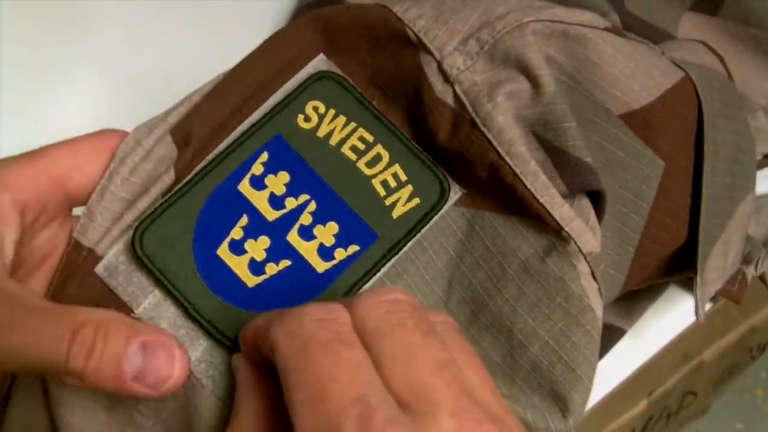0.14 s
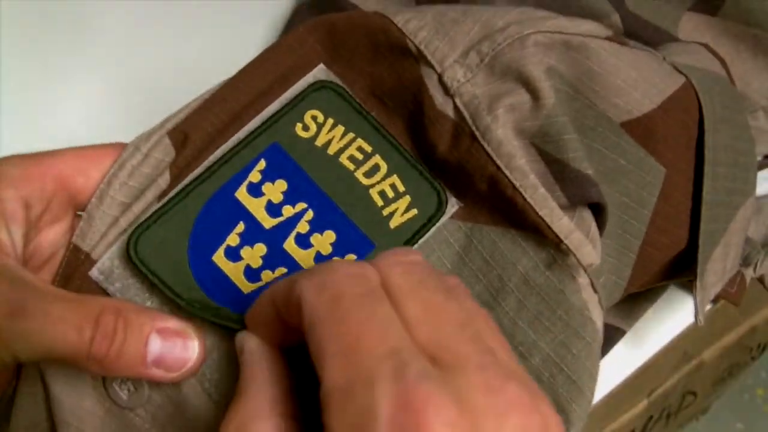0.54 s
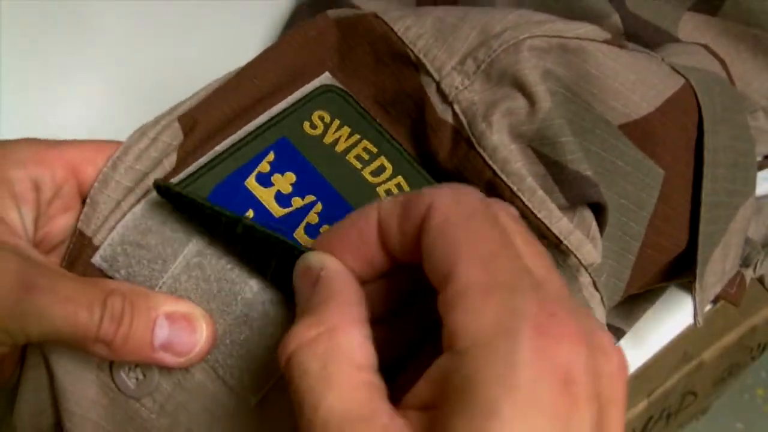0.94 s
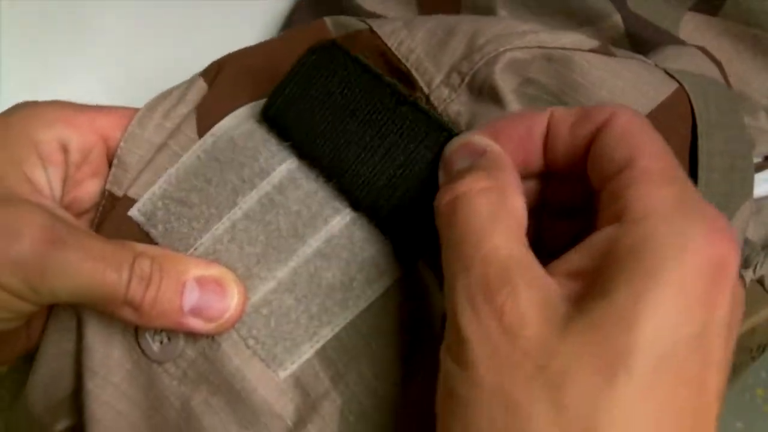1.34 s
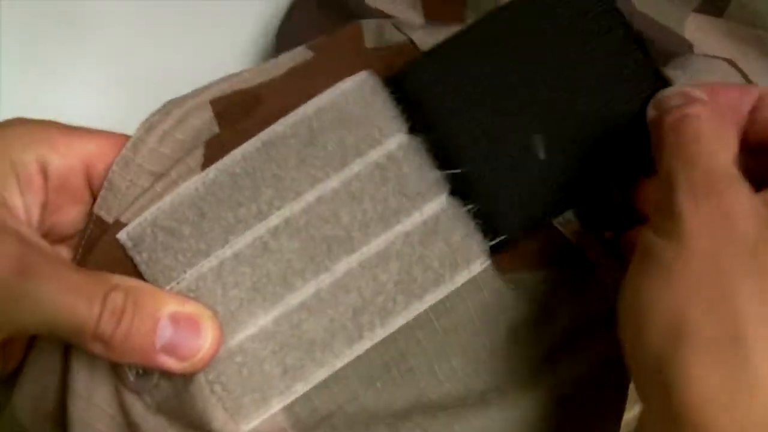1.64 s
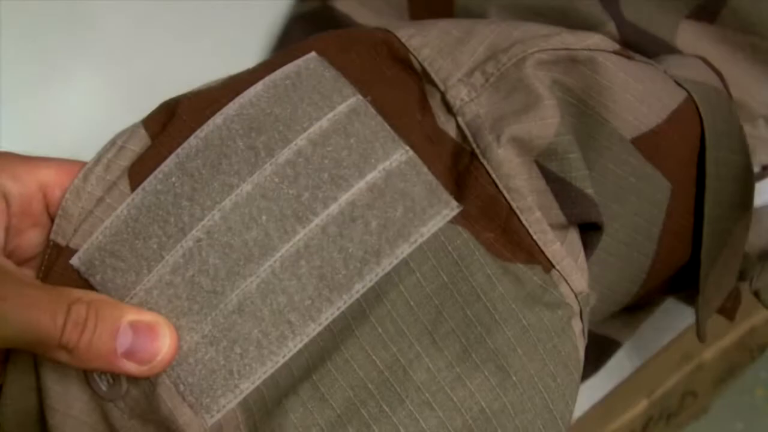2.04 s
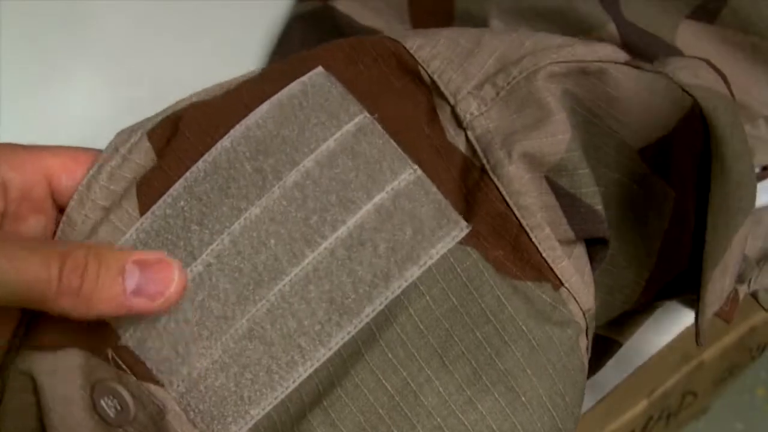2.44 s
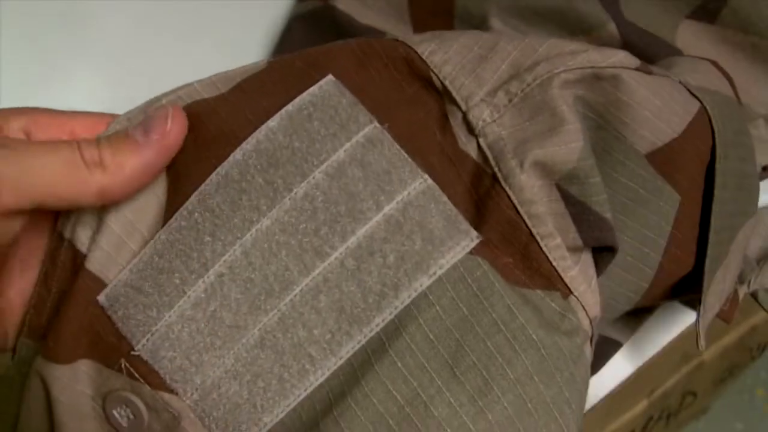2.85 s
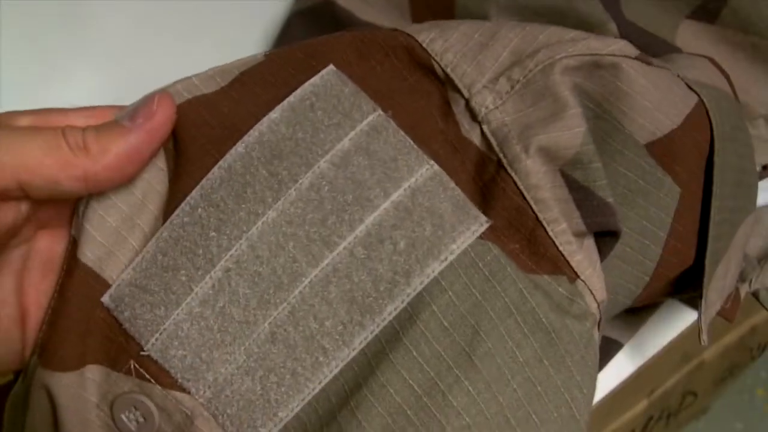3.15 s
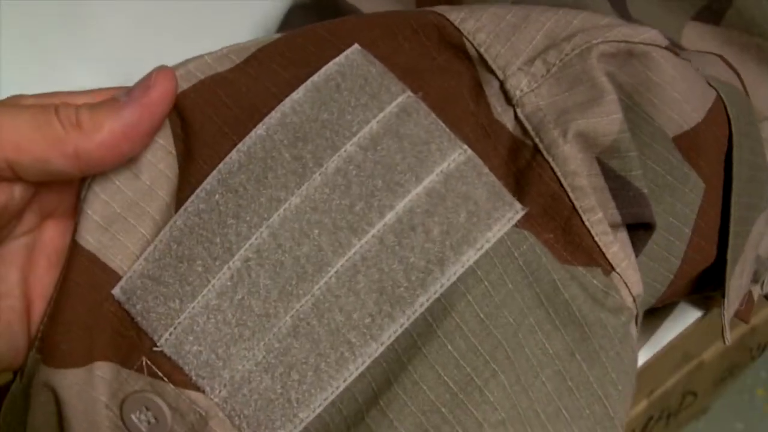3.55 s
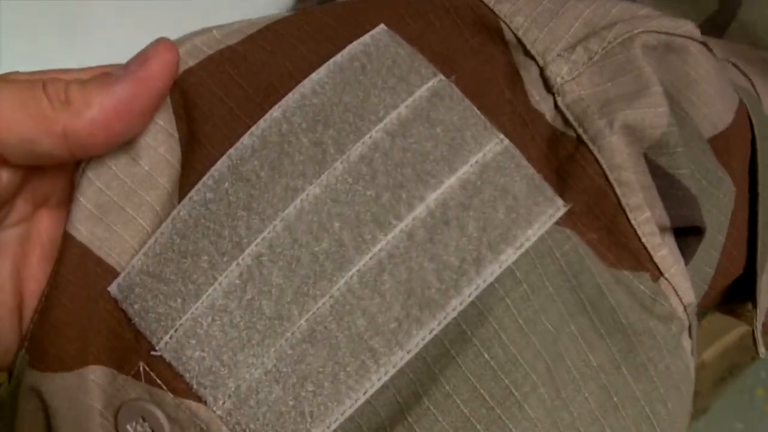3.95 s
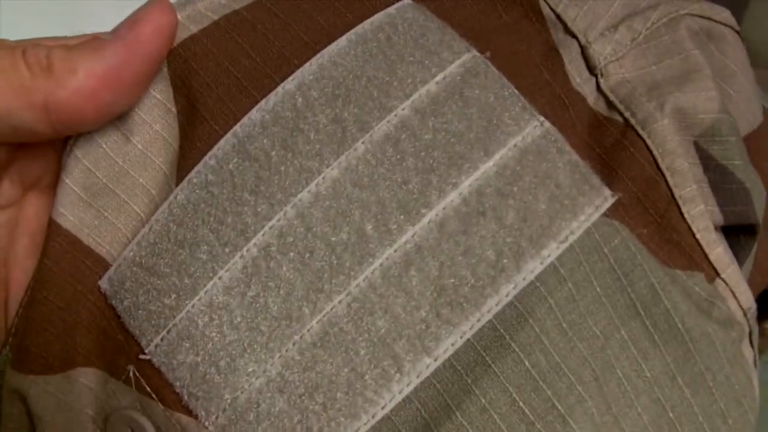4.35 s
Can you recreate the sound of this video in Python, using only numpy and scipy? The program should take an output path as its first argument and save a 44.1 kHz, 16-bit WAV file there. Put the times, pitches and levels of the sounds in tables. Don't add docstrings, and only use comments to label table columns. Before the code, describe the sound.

Separate bright crackles speed up into dense hook-and-loop tearing, loudest just past a second and a half, with a dull thump of backing cloth beneath. The tearing ends suddenly. Hands then brush the fabric softly, with small hollow clicks of a plastic housing, close and dry indoors over faint steady hiss.

```python
import sys
import numpy as np
from scipy import signal
from scipy.fft import rfft, irfft
from scipy.io import wavfile
from scipy.ndimage import uniform_filter1d

SR = 44100
rng = np.random.default_rng(int(sys.argv[2]) if len(sys.argv) > 2 else 0)


def materialize(psi):
    bounded = np.clip(np.atleast_2d(psi).T, -1, 1)
    quanta = np.round(bounded * 32767).astype(np.int16)
    wavfile.write(sys.argv[1], SR, quanta)


def boost(x):
    u = np.asarray(x, float) / 20
    return 10 ** u


N = 198625


def rms_one(x):
    return x / np.sqrt(np.mean(x ** 2, axis=-1, keepdims=True) + 1e-20)


def band(x, low_hz, high_hz):
    return signal.sosfilt(signal.butter(2, [low_hz, min(high_hz, 0.45 * SR)], "band", fs=SR, output="sos"), x)


def highpass(x, order, hz):
    return signal.sosfilt(signal.butter(order, hz, "high", fs=SR, output="sos"), x)


def coloured(spectrum):
    hz, db = np.transpose(spectrum)
    bins = np.arange(N // 2 + 1) * SR / N + 1
    gain = boost(np.interp(np.log(bins), np.log(hz), db))
    return rms_one(irfft(rfft(rng.standard_normal(N)) * gain, N))


def ring(clicks, hz, t60_s):
    decay, turn = boost(-60 / (t60_s * SR)), 2 * np.pi * hz / SR
    return signal.lfilter([0, np.sin(turn)], [1, -2 * decay * np.cos(turn), decay * decay], clicks + 1e-18)


def place(times_s, shapes):
    length = shapes.shape[1]
    out = np.zeros(N + length)
    first = np.round(np.asarray(times_s) * SR).astype(int)
    np.add.at(out, first[:, None] + np.arange(length), shapes)
    return out[:N]


# hz, level_db (per Hz)
HISS_COLOUR = [(25, -20), (60, -16), (150, -11), (280, -9.5), (450, -3.5), (800, -6.5), (1250, -2),
               (1700, -8), (4000, -7), (8000, -8), (12000, -5.5), (15000, -7)]


def hiss(level_db=-67):
    return boost(level_db) * coloured(HISS_COLOUR)


# hz, level_db (per Hz)
SLIDE_COLOUR = [(300, -25), (1200, -11), (3000, -7), (6000, -3.5), (10500, -1), (15000, -5)]
# hz, level_db (per Hz)
RUB_COLOUR = [(150, -27.5), (400, -2.5), (1200, 0.5), (2500, -8), (6000, -21.5)]
# start_s, length_s, slide_db, rub_db
CLOTH_SLIDES = [
    (0, 0.16, -68, -67.5),
    (0.325, 0.1, -74, -74.5),
    (1.809, 0.09, -61.5, -69.5),
    (2.018, 0.021, -70.5, -76),
    (2.31, 0.011, -64, -76.5),
    (2.376, 0.14, -62.5, -72.5),
    (2.607, 0.1294, -71.5, -71.5),
    (2.798, .14, -66.5, -73),
    (3.042, .16, -68.5, -72),
    (3.753, 0.39, -69.5, -73.5),
]
SLIDE_RISE_DB_PER_S, SLIDE_FALL_DB_PER_S, RUB_FADE_DB_PER_S = 399.5, 150, 51
STILL_SLIDE_DB, STILL_RUB_DB = -80.5, -75.5


def rustle():
    start, length, slide_db, rub_db = np.transpose(CLOTH_SLIDES)[:, :, None]
    t = np.arange(0, N, 64) / SR
    before = np.maximum(start - t, 0)
    after = np.maximum(t - start - length, 0)
    slide_db = np.max(slide_db - SLIDE_RISE_DB_PER_S * before - SLIDE_FALL_DB_PER_S * after, axis=0)
    rub_db = np.max(rub_db - RUB_FADE_DB_PER_S * (before + after), axis=0)
    grain = rms_one(uniform_filter1d(rng.standard_normal((2, N)), size=400))
    every_s = np.arange(N) / SR
    slide_db = np.interp(every_s, t, np.maximum(slide_db, STILL_SLIDE_DB))
    rub_db = np.interp(every_s, t, np.maximum(rub_db, STILL_RUB_DB))
    slide = boost(slide_db + 1.5 * grain[0]) * coloured(SLIDE_COLOUR)
    rub = boost(rub_db + 0.94 * grain[1]) * coloured(RUB_COLOUR)
    return slide + rub


# start_s, peak_db, hollow_db, ring_db
HOUSING_KNOCKS = [(0.0186, -40.5, -12.5, -20), (0.252, -34.5, -51, -16.5), (0.387, -39.5, -18.5, -22),
                  (0.705, -38, -19.5, -21), (0.803, -36.5, -27, -17), (1.0231, -37.5, -24, -16),
                  (1.1046, -35.5, -39, -15), (1.3553, -36.5, -20.5, -19), (1.487, -37, -35, -15.5),
                  (2.052, -46, -7, -16), (2.215, -57, -30, -37), (2.457, -58, -25, -30),
                  (2.3029, -34.5, -29, -19), (2.4231, -40, -15.5, -19), (2.5028, -50, -24, -26),
                  (2.6233, -40.5, -15, -18.5), (2.7409, -32.5, -30, -18), (2.8392, -38, -29, -24.5),
                  (3.857, -32.5, -55, -24.5), (4.0243, -42, -13, -14.5), (4.124, -35.5, -23, -16.5)]
# pitch_hz, level_db, t60_s
BODY_MODES = [(1012, -10.5, 0.0365), (1187, -8.5, 0.036), (1360, -5, 0.044), (1534, -8, 0.084),
              (1820, -13, 0.011), (568, -28, 0.12)]
# pitch_hz, level_db, t60_s
HOLLOW_MODES = [(388, 5, .095)]
# pitch_hz, level_db, t60_s
RING_MODES = [(1088, 0, .17), (1264, -8, .13)]
# pitch_hz, level_db, t60_s
EDGE_MODES = [(2150, 5.7, 0.025), (2510, 1.8, 0.014), (3126, 8.7, 0.019), (3780, 6.3, 0.011),
              (4870, 4.6, 0.0074)]
EDGE_DB, REBOUND = -19, 0.42


def knocks(rebound_s=0.00485, touch_s=0.00083, touch=0.11):
    s, peak_db, hollow_db, ring_db = np.transpose(HOUSING_KNOCKS)
    t = np.arange(160) / SR
    lead_s = 0.001
    out = 0
    groups = [(BODY_MODES, 0), (HOLLOW_MODES, hollow_db), (RING_MODES, ring_db), (EDGE_MODES, EDGE_DB)]
    for modes, group_db in groups:
        for hz, level_db, t60_s in modes:
            late, louder = rng.standard_normal((len(s), 2)).T
            contact = np.exp(-((t - 0.002 + 0.0004 * late[:, None]) / 0.00007) ** 2) / 6.3
            contact = contact * boost(peak_db + group_db + level_db + 1.4 * louder)[:, None]
            first_touch = place(s - touch_s - lead_s, touch * contact)
            blow = place(s - lead_s, contact)
            rebound = place(s + rebound_s - lead_s, REBOUND * contact)
            out = out + ring(first_touch + blow + rebound, hz, t60_s)
    return out


NEAR_DB, NEAR_T60_S = -9.5, 0.063
FAR_DB, FAR_T60_S = -17.5, 0.16


def surroundings(x):
    t = np.arange(int(0.4 * SR)) / SR
    near = boost(NEAR_DB - 60 * t / NEAR_T60_S) / np.sqrt(NEAR_T60_S * SR / 14)
    far = boost(FAR_DB - 60 * t / FAR_T60_S) / np.sqrt(FAR_T60_S * SR / 14)
    tail = rng.standard_normal(len(t)) * np.hypot(near, far) * np.clip(t / 0.0002, 0, 1)
    return signal.oaconvolve(x, band(tail, 250, 19000))[:N]


# pitch_hz, width_hz, level_db
BACKING_MODES = [(480, 140, -3.5), (746, 450, 2.5), (1330, 170, 2.5)]


def backing(jerk):
    modes = 0
    for k, (hz, width_hz, db) in enumerate(BACKING_MODES):
        modes = modes + (-1) ** k * boost(db) * width_hz * ring(jerk, hz, 2.5 / width_hz)
    return rms_one(rms_one(modes) + 1.3 * rms_one(band(jerk, 440, 2300)))


def hooks(times_s, peak_db, thump_db, loop_db, bright_db, jerk_s=0.0002):
    jerk = rng.standard_normal((len(times_s), 4, 256)) * np.exp(-np.arange(256) / SR / jerk_s)
    thump = boost(thump_db + 0.5)[:, None] * backing(jerk[:, 0])
    loop = boost(loop_db)[:, None] * rms_one(band(jerk[:, 1], 2200, 4600))
    stem = rms_one(band(jerk[:, 2], 4400, 8000))
    tip = boost(bright_db)[:, None] * rms_one(band(jerk[:, 3], 8000, 13000))
    release = (rms_one(loop + stem + tip) + thump) * np.hanning(512)[256:]
    return place(times_s, release * boost(peak_db - 15.5)[:, None])


def random_hooks(times_s, peak_db, thump_db, loop_db, bright_db, tint_db=3.0):
    tint = tint_db * rng.standard_normal((len(times_s), 3))
    return hooks(times_s, peak_db, thump_db + tint[:, 0], loop_db + tint[:, 1], bright_db + tint[:, 2])


# start_s, peak_db, thump_db, bright_db
STRONG_HOOKS = [(0.4362, -10.5, -9, -1), (0.4712, -26, -4, -6), (0.4935, -31.5, -16, -1),
                (0.524, -29, -12, 5), (0.5264, -31.5, -3, -18), (0.5293, -12, -14, 2.5),
                (0.581, -14.5, -11.5, 9), (0.582, -10, -9.5, 2), (0.6533, -16, -15.5, 5.5),
                (0.6538, -14, -16, 24), (0.744, -8, -15.5, 8), (0.7459, -17, -13, 15),
                (0.7944, -31, -17, 16), (0.8472, -17.5, -12.5, 6.5), (0.8782, -2.5, -15, 3),
                (0.987, -11.5, -10.5, 5.5), (1.0939, -17, -16.5, 6), (1.1199, -31, -24, 3),
                (1.1598, -18, -18, 6), (1.1648, -12.5, -17.5, 1.5), (1.1764, -5.5, -17.5, 3.5),
                (1.185, -21, -13.5, -0.5), (1.189, -14.5, -14.5, 0.5), (1.282, -12.5, -28, 20),
                (1.2929, -12.5, -18, 12), (1.421, -11.5, -19, 27.5), (1.423, -24, -10.5, 10),
                (1.4314, -17, -18, 5), (1.436, -29, -20.5, 9.5), (1.4537, -15, -18, 3)]
# start_s, peak_db
FIRST_PULL = [(0.8626, -13), (0.866, -13), (0.8696, -16.5), (0.8836, -18), (0.891, -24), (0.9027, -14.5),
              (0.9094, -11.5), (0.9197, -5.5), (0.9236, -8.5), (0.9253, -20.5), (0.9316, -12),
              (0.9343, -27.5), (0.937, -17), (0.9389, -8), (0.9405, -10), (0.9497, -18), (0.9531, -13.5),
              (0.9698, -13), (0.9746, -29.5), (0.9778, -20)]
# start_s, peak_db, thump_db
STRAY_TICKS = [(0.3292, -50, -21), (0.5041, -44, -5), (0.507, -44, 6), (0.5542, -36.5, -10),
               (0.572, -41, -17), (0.6397, -41, -21), (0.7, -41, -19), (0.709, -37, -15), (0.729, -35, -9),
               (0.7713, -35.5, -19), (0.805, -35, -11), (0.8114, -36, -19), (1.1424, -43.5, -2),
               (1.148, -32, -6), (1.4186, -32.5, -13), (1.506, -41, -24), (1.8376, -40, -1),
               (1.8701, -52.5, -6), (1.889, -49.5, -21.5), (1.9028, -48.5, -9)]
# start_s, peak_db, thump_db, loop_db, bright_db
CLOTH_CREASES = [
    (2.2662, -56, -25, -15, 15),
    (2.3114, -45, -18, -5, 2),
    (2.5262, -39, -22, -5, 8),
    (2.6085, -44, -20, -9, 12),
    (2.9173, -42, -19, -6, 0),
    (3.0659, -47, -17, -2, 1),
    (3.0949, -44, -20, -5, 7),
    (3.1602, -45, -20, -8, 5),
]
CRACKLE_THUMP_DB, CRACKLE_BRIGHT_DB, TICK_BRIGHT_DB = -13, 5.5, 5.5
LOOP_DB, FIRST_LOOP_DB, LOOPS_TAUT_S = -5.5, -28, 0.58


def lone_hooks():
    s, peak_db, thump_db, bright_db = np.transpose(STRONG_HOOKS)
    loop_db = np.where(s < LOOPS_TAUT_S, FIRST_LOOP_DB, LOOP_DB)
    snaps = hooks(s, peak_db, thump_db, loop_db, bright_db)
    crackle = random_hooks(*np.transpose(FIRST_PULL), CRACKLE_THUMP_DB, LOOP_DB, CRACKLE_BRIGHT_DB)
    ticks = random_hooks(*np.transpose(STRAY_TICKS), LOOP_DB, TICK_BRIGHT_DB)
    return snaps + crackle + ticks + hooks(*np.transpose(CLOTH_CREASES))


# start_s, level_db
PULL_FORCE = [
    [(.86, -30), (.93, -27.5), (.99, -24)],
    [(1.194, -25), (1.222, -20), (1.25, -26), (1.264, -20), (1.28, -30)],
    [(1.54, -31), (1.555, -29), (1.559, -20), (1.611, -13.5), (1.638, -18), (1.648, -27.5)],
    [(1.65, -20.5), (1.675, -19.5), (1.69, -27.5), (1.718, -26.5), (1.723, -42), (1.758, -41), (1.773, -22),
     (1.8, -25.5), (1.809, -27.5)],
]
# start_s, peak_db
ROW_SURGES = [(1.196, -11.5), (1.2023, -13.5), (1.2145, -11), (1.2221, -9), (1.238, -9), (1.2558, -12.5),
              (1.2668, -9.5), (1.5414, -9), (1.5441, -16.5), (1.5507, -16.5), (1.5582, -9), (1.5716, -10),
              (1.5907, -9), (1.6143, -7), (1.6353, -11.5), (1.6519, -5), (1.6553, -7), (1.661, -12.5),
              (1.6857, -14), (1.704, -12.5), (1.7189, -8), (1.7307, -19), (1.735, -17), (1.741, -13),
              (1.7531, -19.5), (1.7551, -17), (1.7617, -15), (1.774, -10), (1.7783, -12.5), (1.7941, -13)]
SWARM_LEVELS = [-35, -15, -16.5, -14]
BUNCH_GAP_S, BUNCH_DB, BUNCH_SPREAD_DB = 0.003, 6, 3.0
RIP_COLOUR = -15.5, -3, 6


def rips(bunch_s=0.0008, per_s=4000, spread_db=4.0):
    bunches = [np.transpose(ROW_SURGES)]
    for t, pull_db in map(np.transpose, PULL_FORCE[1:]):
        jitter, scatter = rng.random(120), rng.uniform(-0.89, 1.6, 120)
        s = t[0] + BUNCH_GAP_S * (np.arange(120) + 0.8 * jitter)
        force_db = np.interp(s, t, pull_db, right=-150)
        bunches.append([s, force_db + BUNCH_DB + BUNCH_SPREAD_DB * scatter])
    s, peak_db = np.hstack(bunches)[:, :, None]
    when = s + 0.00027 + bunch_s * rng.uniform(-1.6, 1.8, (len(s), 8))
    share = rms_one(boost(spread_db * rng.standard_normal(when.shape)))
    hook_db = peak_db - 4.5 + 20 * np.log10(share)
    out = random_hooks(when.ravel(), hook_db.ravel(), *RIP_COLOUR)
    for rows, thin_db in zip(PULL_FORCE, SWARM_LEVELS):
        t, pull_db = np.transpose(rows)
        wait, size = rng.random((1100, 2)).T
        when = t[0] + np.cumsum(-np.log(wait)) / per_s
        weak_db = np.interp(when, t, pull_db, right=-150) + thin_db - 1.4 * np.log(size + 0.02)
        out = out + random_hooks(when, weak_db, *RIP_COLOUR)
    return out


def scene():
    peel = lone_hooks() + rips()
    near = highpass(peel + surroundings(peel), 2, 260)
    taps = highpass(knocks(), 5, 350)
    return (hiss() + rustle() + taps + near)[None]


def roll_off(x):
    return signal.sosfilt(signal.butter(12, 16640, fs=SR, output="sos"), x)


def record(dry):
    x = 0.8 * np.tanh(dry / 0.8)
    x = highpass(x, 1, 150)
    b, a = signal.iirnotch(7930, 60, fs=SR)
    x = signal.lfilter(b, a, x)
    x = signal.sosfilt(signal.ellip(8, 0.5, 50, 15700, fs=SR, output="sos"), x)
    return roll_off(x)


dry = scene()
out = record(dry)
materialize(out)
```